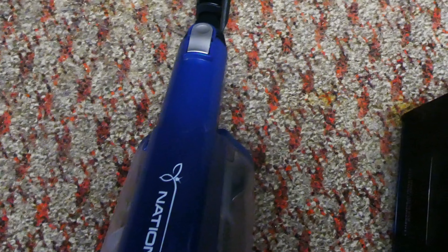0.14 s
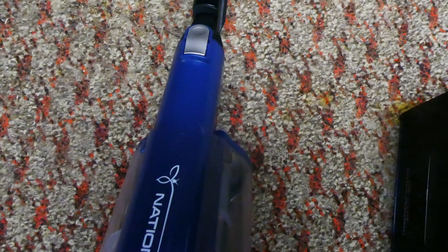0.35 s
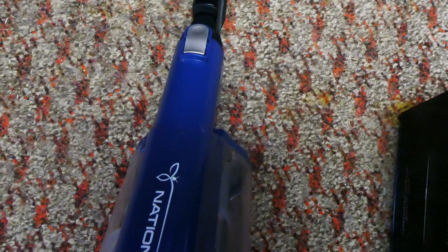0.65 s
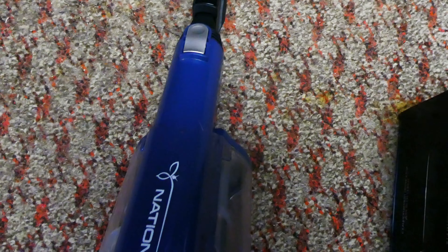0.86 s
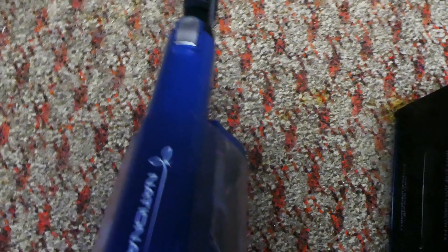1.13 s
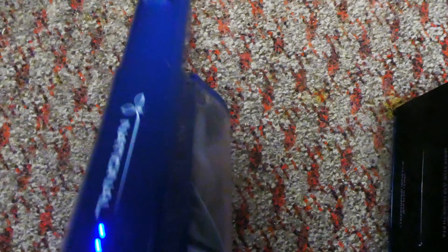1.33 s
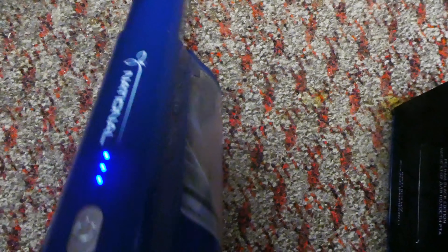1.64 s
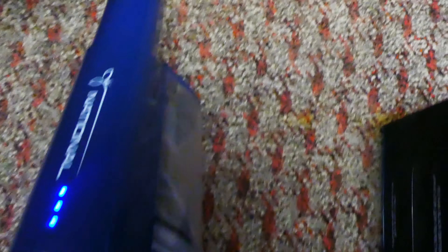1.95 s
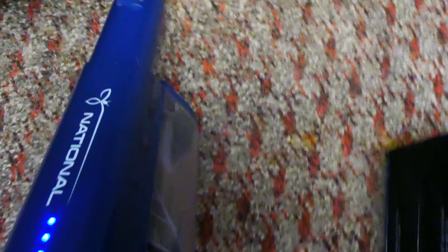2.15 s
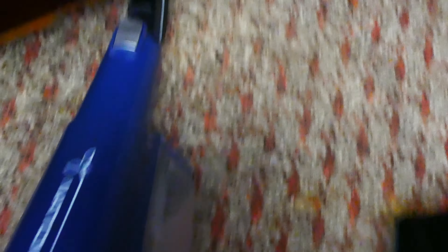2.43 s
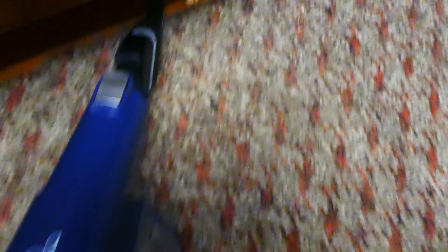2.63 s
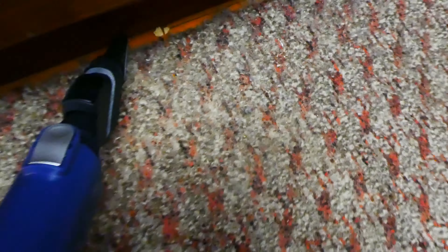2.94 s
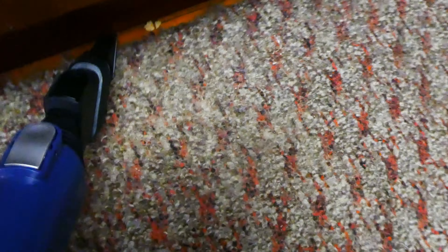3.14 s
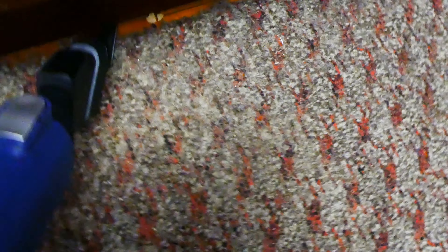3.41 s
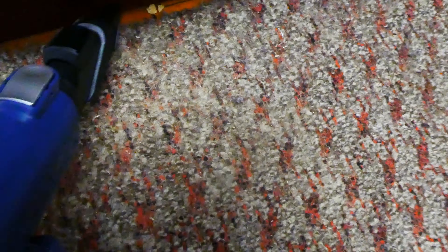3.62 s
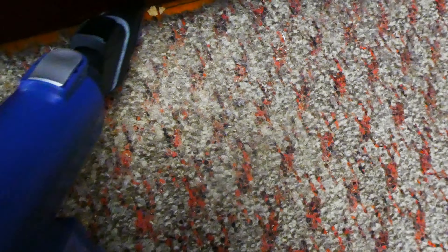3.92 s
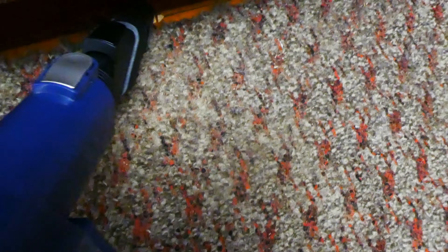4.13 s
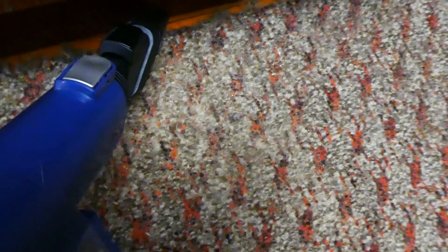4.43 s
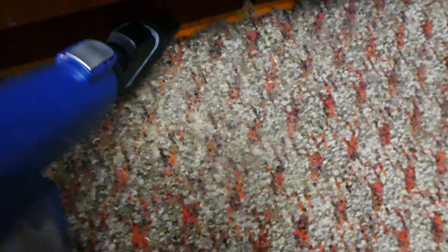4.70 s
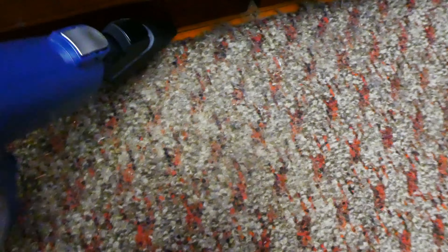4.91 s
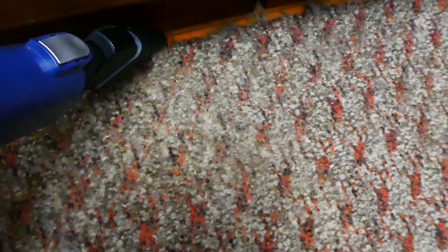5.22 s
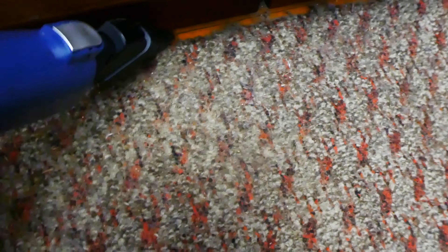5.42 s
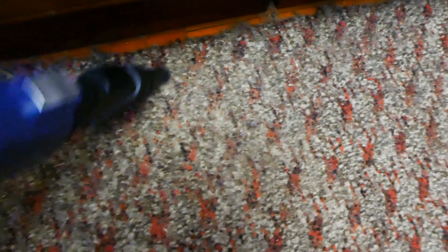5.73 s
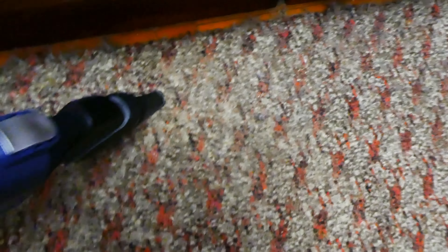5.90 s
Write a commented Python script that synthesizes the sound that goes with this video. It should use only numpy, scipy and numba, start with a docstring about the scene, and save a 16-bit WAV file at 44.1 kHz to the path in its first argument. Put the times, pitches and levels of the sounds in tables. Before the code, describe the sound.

A small vacuum cleaner clicks on close by, its whine climbing within a second to a steady high-pitched drone and airy roar, with a brief grit rattle.

```python
"""A small switch click in a quiet room is heard first; then a cordless stick vacuum starts beside the microphone.
Chopped current whistles, shaft-locked tones climb to about 448 turns a second, and brushes scratch the commutator.
A flap pops open; turbulent air is noise shaped by the ducts, its nozzle on carpet along a skirting board.
Later the nozzle tips up and grit, as short resonant blows and dense ticks, rattles up the tube.
The recorder's limiter ducks under the loudest peaks."""
import sys
import numpy as np
from scipy import signal
from scipy.fft import rfft, irfft
from scipy.io import wavfile
from scipy.ndimage import uniform_filter1d, minimum_filter1d
from numba import njit

SR = 44100
rng = np.random.default_rng(int(sys.argv[2]) if len(sys.argv) > 2 else 0)


def transcribe(u):
    """Save the signal u as a 16-bit wav file named by the first command-line argument.

    u: samples, shape (n,) or (channels, n), limited to [-1, 1]; the rate is SR.
    q: integer samples, one column per channel.
    """
    v = np.clip(np.atleast_2d(u).T, -1, 1)
    q = np.round(v * 32767).astype(np.int16)
    wavfile.write(sys.argv[1], SR, q)


N = 267334
TIME = np.arange(N) / SR  # seconds
FREQ = np.maximum(np.fft.rfftfreq(N, 1 / SR), 1)  # Hz

# The motor starts, gains speed evenly under its current limit, then eases up to full speed.
POWER_ON_S, START_S, RAMP_END_S, BREAKAWAY_S = 0.497, .622, 1.25, .028
RAMP_HZ_PER_S, FULL_HZ = 534.2, 448.5
# Time constants of the final approach to full speed, in seconds.
EASE_S = (.132, .35)
# The suction load slowly drags the motor down a little.
SAG_FROM_S, SAG_S, SAG_HZ = 4.5, 1.02, 1.96
# The nozzle tips away from the skirting board.
TIP_FROM_S, TIP_S = 4.57, 0.48
CHOP_HZ = 4984.3  # rate of the current chopper
TOP_HZ = 15600  # upper edge of the recorded band

# Loud whines. Each entry: name, multiple of the shaft speed.
WHINE_ORDERS = {"rotor 2": 2, "bearing": 2.573, "rotor 3": 3, "commutator": 5, "fan": 7, "commutator 2": 10,
                "commutator 3": 15}
# Growth of the whines. Each row: name, level in dB at full speed before the casing, power of the speed,
# drift in dB per s as the hand wanders, change in dB with the nozzle tipped.
WHINES = [("rotor 2", -43, 0.33, -0.86, 5), ("bearing", -28, 1.77, -2.3, -10.5),
          ("rotor 3", -27, 6.5, -2.16, -5), ("commutator", -23.5, 1.87, 0.067, -9.5),
          ("fan", -20.5, 1.95, -1.71, -3.5), ("commutator 2", -27, 1.6, -1.3, 1),
          ("commutator 3", -30.5, 5.1, -1.4, 0)]
# Standing waves shift past the microphone. Each row: whine, centre in seconds, length in seconds, change in dB.
STANDING_WAVES = [("commutator 3", 1.85, 0.13, -16), ("commutator 2", 1.9, 1, -11.5),
                  ("commutator 3", 2.42, .13, -8), ("fan", 2.66, .3, -15), ("commutator", 3.15, .6, -9),
                  ("bearing", 3.2, .6, -8), ("commutator 3", 3.3, 0.55, -6), ("commutator 3", 4.29, .4, -9),
                  ("rotor 3", 4.72, 0.49, -14), ("commutator 3", 5.18, 0.59, -16),
                  ("commutator", 5.53, .2, -10), ("commutator", 5.78, 0.13, 8.2),
                  ("commutator 3", 5.98, 0.074, 9.7), ("fan", 6.0, 0.12, 5.8)]
# Weaker shaft tones; the fractions come from the bearing. Each entry: multiple of the shaft speed.
WEAK_ORDERS = [4, 4.146, 4.573, 5.146, 6, 7.146, 8, 9, 12, 14, 20, 21, 22, 25, 26, 28, 30, 35]
# Their strengths in the same order. Each entry: level in dB at full speed before the casing.
WEAK_DB = [-38.5, -47, -38, -42.5, -40.5, -48, -62, -46.5, -47, -44, -39.5, -51, -51, -44.5, -67, -62, -50,
           -64]
# Hum of the rotor's unbalance, before trim and flutter. Each row: time in seconds, level in dB.
HUM = [(2.08, -23.5), (2.59, -19), (3.81, -15.5), (4.68, -12.5)]
# Casing resonances and nulls the tones glide through. Each row: centre in Hz, width in Hz, lift in dB.
CASING = [(374.6, 77, 13), (422.3, 9, -10), (439, 3.5, -17.5), (669, 89, 17), (863, 54, 7),
          (1433, 214, 6.5), (1640, 79, 0), (2087, 125, -5.5), (2966, 350, 4.5), (3480, 73, 4.5),
          (12930, 460, 17), (15200, 510, 13)]
# Whistle of the chopped battery current. Each row: time in seconds, level in dB.
CHOPPER = [(0.53, -52.5), (0.7, -44.5), (1.46, -32), (1.95, -41), (2.84, -46), (3.29, -31), (4.12, -43),
           (5.34, -36), (6.0, -39)]
# Sidebands the commutator adds to the whistle. Each row: multiple of the speed added, relative level in dB.
SIDEBANDS = [(-10, -7.5), (-7, -17), (-5, -1), (-2, -17), (2, -12), (5, -9), (10, -22)]
# Motor housing rung by the brushes. Each row: centre in Hz, width in Hz, relative level in dB.
HOUSING = [(1117, 120, 4), (1826, 46, 5.5), (2330, 190, 3), (3480, 140, -1.5)]
# Colour of the air before the duct resonances. Each row: frequency in Hz, density in dB per Hz.
AIR_COLOUR = [(30, -109), (60, -86), (110, -79), (200, -62.5), (290, -60), (420, -52), (580, -62),
              (1000, -65.5), (1400, -59.5), (3000, -66), (5500, -67), (8200, -74.5), (10000, -71),
              (15500, -88.5)]
# Resonances of tube and dust bin. Each row: centre in Hz, width in Hz, lift in dB.
DUCT = [(717, 43, 2.5), (1323, 37, 6), (1780, 87, 2), (2470, 43, 4.5), (3580, 390, 3.5), (7360, 140, 5.5)]
# Rumble, rush and hiss in turn. Each row: gain in dB at full speed, power of the speed,
# change in dB with the nozzle tipped.
SUCTION = [(0.5, 0.88, -1.7), (2, 0.94, -5), (1.44, 1.6, -2)]
# The airflow surges. Each row: centre in seconds, length in seconds, lift of the hum in dB,
# lift of the rumble in dB (the rush gets half).
SURGES = [(3.0, 0.83, 1, 1.5), (3.67, 0.16, 2.5, 2.5), (4.006, 0.096, 4, 3.5), (4.338, 0.045, 2, 0)]
# Resonances of the nozzle mouth. Each row: centre in Hz, width in Hz, level in dB against the board,
# level in dB tipped open; both before speed scaling.
MOUTH = [(700, 300, -44.5, -34.5), (2660, 510, -49, -31.5)]
# The body drifts to the left, scaled for each source. Each row: time in seconds, left minus right in dB.
PAN = [(0, 5), (1, 2), (1.75, 2), (3, 3.5), (4.5, 5.5), (6, 7)]
# The inlet flap pops open. Each row: start in seconds, peak in dB.
FLAP = [(.8772, -5)]
# Modes of the flap. Each row: frequency in Hz, relative level in dB, 60 dB decay time in seconds.
FLAP_MODES = [(1116, -1, 0.011), (940, -25, 0.013), (1510, -10, 0.0099), (4800, -18, .005)]
# Grit hits the tube. Each row: start in seconds, peak in dB before the limiter.
GRIT = [(4.7125, -9), (4.7228, -0.5), (4.7255, -1), (4.7752, 11)]
# Modes of the tube wall. Each row: frequency in Hz, relative level in dB, 60 dB decay time in seconds.
TUBE_MODES = [(5430, -2, 0.0079), (7100, -12, 0.0058), (9000, -2, 0.0071), (8700, -7.5, 0.0071),
              (10240, -12, 0.011), (12000, -12, 0.005)]
# One grain pings the bin. Each row: start in seconds, peak in dB.
PING = [(4.9352, -13)]
# Mode of the bin. Each row: frequency in Hz, relative level in dB, 60 dB decay time in seconds.
PING_MODES = [(5370, 0, 0.018)]
# Clicks of the switch and handle. Each row: start in seconds, peak in dB.
SWITCH = [(.0365, -34), (.4125, -30.5), (.482, -34.5), (.579, -31.5)]
# Modes of the plastic handle. Each row: frequency in Hz, relative level in dB, 60 dB decay time in seconds.
HANDLE_MODES = [(1155, -1, 0.032), (2760, 2, 0.0084), (4420, 7, 0.0073), (10300, -4, 0.011)]
# Quiet room, before stereo widening. Each row: frequency in Hz, density in dB per Hz.
ROOM_TONE = [(30, -105), (120, -92.5), (300, -89), (1000, -99), (2400, -99), (3500, -106), (4700, -100),
             (6500, -108), (10000, -110), (15000, -119)]


def spin_up():
    """Rotational dynamics: soft breakaway, even climb in turns per second, exponential approach, slight sag."""
    climbing_s = BREAKAWAY_S * np.logaddexp(0, (np.minimum(TIME, RAMP_END_S) - START_S) / BREAKAWAY_S)
    climb = RAMP_HZ_PER_S * climbing_s * ramp(POWER_ON_S, START_S - POWER_ON_S)
    since_ramp = np.maximum(TIME - RAMP_END_S, 0)
    eased = 1 - np.mean([np.exp(-since_ramp / s) for s in EASE_S], axis=0)
    return climb + (FULL_HZ - climb[-1]) * eased - SAG_HZ * ramp(SAG_FROM_S, SAG_S)


def motor(speed, angle, pan_db, tipped, hum_db):
    """Order tones: all lock to the shaft, grow with speed and sweep through the casing's resonances."""
    hum = unbalance_hum(speed, angle, pan_db, tipped, hum_db)
    tones = whines(speed, angle, tipped) + weak_tones(speed, angle, tipped)
    # the whines jump up when the current limit lets go
    drive = undb(-5.0 * (1 - ramp(RAMP_END_S, 0.004)))
    return hum + drive * tones * panned(0.74 * pan_db)


def unbalance_hum(speed, angle, pan_db, tipped, hum_db, trim_db=-1.9, flutter_db=2.07):
    """Rotating unbalance: one cycle a turn, with turbulent flutter that calms as the nozzle tips."""
    flutter = flutter_db * (1 - .75 * tipped) * walk(22.23)
    gain = undb(hum_db + trim_db - 1.5 * tipped + flutter)
    hum = tone(angle, fade=0.016, spread=0.16)
    return hum * gain * casing(speed) * grown(speed, 1.6) * panned(pan_db)


def whines(speed, angle, tipped, rough=0.11):
    """Harmonic excitation: rotor, bearing, commutator and fan sound at fixed multiples of the speed."""
    # while the pitch glides, the tones stumble through many small resonances
    gliding = 1 - speed / speed.max()
    running_s = np.maximum(TIME - RAMP_END_S, 0)
    total = 0
    for name, db, growth, drift_db_per_s, tipped_db in WHINES:
        order = WHINE_ORDERS[name]
        stumble = undb(4 * gliding * (np.clip(walk(45), -2, 1) - .2))
        fades_db = sum(swell(*row) for which, *row in STANDING_WAVES if which == name)
        moved_db = drift_db_per_s * running_s + tipped_db * tipped + fades_db
        gain = undb(db + moved_db) * casing(order * speed) * grown(speed, growth)
        roughness = 1 + rough * walk(90)
        total = total + tone(order * angle, fade=0.028, spread=0.12) * gain * stumble * roughness
    return total


def weak_tones(speed, angle, tipped):
    """Multipath interference: weaker orders vary more with the moving reflections the higher they lie."""
    total = 0
    for order, db in zip(WEAK_ORDERS, WEAK_DB):
        partial = tone(order * angle, fade=0.054 + 0.048 * order, spread=0.65, drift_rate=3.3)
        total = total + partial * undb(db) * casing(order * speed)
    return total * undb(-1 * tipped) * grown(speed, 5.1)


def casing(hz, cutoff_hz=230):
    """Radiation of a small body: resonances and nulls weight a tone, and little bass escapes."""
    return undb(lift(hz, CASING)) * hz ** 4 / (hz ** 4 + cutoff_hz ** 4)


def tone(phase, fade, spread, drift_rate=2.535):
    """Interference: a sine adds to reflections that shift as the hand moves and differ at the two ears."""
    knots = np.arange(0, N / SR + 1, 1 / drift_rate)
    common, apart = rng.standard_normal((2, len(knots))) + 1j * rng.standard_normal((2, len(knots)))
    paths = np.array([np.interp(TIME, knots, 1 + fade * common + ear * spread * apart) for ear in (1, -1)])
    phase = phase + 2 * np.pi * rng.random()
    return np.sqrt(2 / (1 + fade ** 2)) * (paths.real * np.sin(phase) + paths.imag * np.cos(phase))


def controller(speed, angle, settle_hz=400):
    """Modulation: chopped current makes the windings whistle, and the commutator splits it into sidebands."""
    db, = curves(CHOPPER)
    phase = 2 * np.pi * CHOP_HZ * TIME
    # the sidebands fade once the motor is up to speed
    starting = np.clip(speed / 20, 0, 1) * np.exp(-(speed / settle_hz) ** 6)
    sidebands = 0
    for order, side_db in SIDEBANDS:
        uneven = undb(side_db + 3 * walk(34.4))
        sidebands = sidebands + uneven * tone(phase + order * angle, fade=0.17, spread=0.12, drift_rate=8.5)
    harmonics = np.sin(2 * phase) + undb(-14) * np.sin(3 * phase)
    commutation = 1 + .4 * starting * np.sin(5 * angle)
    overtones = undb(-2 - 20 * grown(speed, 1.15)) * np.sqrt(2) * harmonics * commutation
    whistle = tone(phase, fade=0.19, spread=0.053) + starting * sidebands + overtones
    return whistle * undb(db) * ramp(POWER_ON_S, .018)


def brushes(speed, angle, starting_db=-25.5, running_db=-43, full_scrape_hz=195):
    """Friction excitation: carbon brushes cross the commutator gaps and ring the housing, hardest at the start."""
    gaps = np.cos(5 * angle)
    scratch = irfft(stereo_noise(0.19), N) * (1 + gaps) * undb(2.0 * walk(59.73))
    ring = sum(undb(db) * band(scratch, hz, width) for hz, width, db in HOUSING)
    ring = signal.sosfilt(signal.butter(2, [700, 3200], "bandpass", fs=SR, output="sos"), ring)
    level_db = starting_db + (running_db - starting_db) * ramp(1.27, 2.6)
    return ring / ring.std() * undb(level_db) * np.minimum(speed / full_scrape_hz, 1) ** 1.65


def suction(speed, angle, pan_db, tipped, surge_db, rumble_hz=750, hiss_hz=2900):
    """Turbulent flow: rumble builds and gusts, hiss stays smooth, and the rotor pulses the upper bands each turn."""
    shape = colour(AIR_COLOUR) * undb(lift(FREQ, DUCT))
    # the stereo image is widest in the deep bass and the treble
    width = .3 + .5 * (FREQ / 11500) ** 2 + 0.89 / (1 + (FREQ / 80) ** 2)
    noise = shape * stereo_noise(width)
    low = 1 / (1 + (FREQ / rumble_hz) ** 6)
    high = 1 / (1 + (hiss_hz / FREQ) ** 12)
    bands = []
    for share, (db, growth, tipped_db) in zip((low, 1 - low - high, high), SUCTION):
        bands.append(irfft(noise * share, N) * undb(db + tipped_db * tipped) * grown(speed, growth))
    rumble, rush, hiss = bands
    build_db = -4.0 * (1 - ramp(RAMP_END_S, 1.7))
    rumble = rumble * undb(2.6 * walk(24.8) + surge_db + build_db)
    rush = rush * undb(1.3 * walk(24.76) + .5 * surge_db)
    upper = (rush + hiss) * (1 + 0.093 * np.sin(angle))
    return (rumble + upper) * panned(0.39 * pan_db)


def nozzle(speed, pan_db, tipped):
    """Cavity resonance: passing air excites the mouth's broad resonances, which hoot as it tips open."""
    out = 0
    for hz, width, closed_db, open_db in MOUTH:
        hoot = band(band(irfft(stereo_noise(0.79), N), hz, width), hz, width)
        out = out + hoot / hoot.std() * undb(closed_db + (open_db - closed_db) * tipped)
    return out * grown(speed, 4.8) * panned(1.2 * pan_db)


def inlet_flap():
    """Impulse response: the flap pops open and rings its few damped modes."""
    return knocks(FLAP, FLAP_MODES, crack=.06, crack_t60=0.018, width=0.13, low_hz=500)


def grit():
    """Impact excitation: single grains strike the tube wall amid a patter of fine sand."""
    return knocks(GRIT, TUBE_MODES, crack=2.1, crack_t60=0.012, width=0.84, low_hz=3530) + rattle()


def rattle(centre_s=4.721, spread_s=0.0069, grains_per_s=2500, peak_db=2.0):
    """Random impacts: a pinch of fine sand patters up the tube and wakes the housing's ring."""
    density = np.exp(-.5 * ((TIME - centre_s) / spread_s) ** 2)
    grains = (rng.random(N) < density * grains_per_s / SR) * rng.standard_normal(N)
    tick = rng.standard_normal((2, 90)) * np.exp(-np.arange(90) / 25)
    sand = signal.fftconvolve(grains[None], tick + tick[::-1] * .5, axes=1)[:, :N]
    sand = sand + 2.2 * band(sand, 2640, 720)
    sand = signal.sosfilt(signal.butter(1, 7000, fs=SR, output="sos"), treble(sand, 1800))
    return undb(peak_db) * sand / np.abs(sand).max()


def bin_ping():
    """Single-mode response: one grain pings the bin."""
    return knocks(PING, PING_MODES, crack=.1, crack_t60=.01, width=.3, low_hz=3000)


def handle_clicks():
    """Impulse response: the switch and handle click through the modes of the plastic."""
    return knocks(SWITCH, HANDLE_MODES, crack=1.4, crack_t60=0.029, width=0.99, low_hz=900)


def knocks(events, modes, crack, crack_t60, width, low_hz, high_hz=12000):
    """Modal synthesis: each blow rings the damped modes of a part, with a short noisy crack."""
    out = np.zeros((2, N))
    t = TIME[:SR // 10]
    crack_filter = signal.butter(2, min(high_hz, SR * .45), fs=SR, output="sos")
    for s, db in events:
        # phases differ between the ears
        offsets = width * rng.standard_normal((len(modes), 2, 1))
        ring = 0
        for (hz, mode_db, t60), offset in zip(modes, offsets):
            ring = ring + undb(mode_db - 60 * t / t60) * np.sin(2 * np.pi * hz * t + offset)
        snap = signal.sosfilt(crack_filter, rng.standard_normal((2, len(t))))
        blow = ring + crack * snap * undb(-60 * t / crack_t60)
        hit = treble(blow * (1 - np.exp(-t / 0.0012)), low_hz)
        start = int(s * SR)
        out[:, start:start + len(t)] += undb(db) * hit / np.abs(hit).max()
    return out


def quiet_room():
    """Diffuse field: faint coloured noise with equal mid and side parts."""
    return irfft(colour(ROOM_TONE) * stereo_noise(1.0), N)


def undb(db):
    """Level law: decibels to amplitude gain."""
    return 10 ** (np.asarray(db) / 20)


def curves(table):
    """Linear interpolation: each column of a table is joined by straight lines in time."""
    s, *columns = np.transpose(table)
    return [np.interp(TIME, s, c) for c in columns]


def colour(points):
    """Spectral density: the gain that gives unit white noise the listed density."""
    hz, db = np.transpose(points)
    return undb(np.interp(np.log(FREQ), np.log(hz), db)) * np.sqrt(SR / 2)


def walk(rate):
    """Slow random modulation: smooth chance of unit spread, renewed rate times a second."""
    k = max(int(SR / rate), 2)
    held = np.repeat(rng.standard_normal(N // k + 2), k)
    smooth = uniform_filter1d(uniform_filter1d(held, k), k)[:N]
    return smooth / smooth.std()


def panned(pan_db):
    """Interaural level difference: left and right gains with a mean of one."""
    gains = undb(np.array([pan_db, -pan_db]) / 2)
    return gains / gains.mean(axis=0)


def stereo_noise(width):
    """Partial coherence: spectra of left and right noise share a mid part and oppose a side part."""
    mid, side = rfft(rng.standard_normal((2, N)))
    return np.array([mid + width * side, mid - width * side])


def band(x, hz, width):
    """Simple resonator: two poles with a peak gain of one."""
    return signal.lfilter(*signal.iirpeak(hz, hz / width, fs=SR), x)


def lift(hz, resonances):
    """Resonance curves: the decibels that a set of resonances adds at these frequencies."""
    return sum(db / (1 + (2 * (hz - centre) / width) ** 2) for centre, width, db in resonances)


def treble(x, low_hz):
    """Radiation efficiency: small parts radiate little bass."""
    return signal.sosfilt(signal.butter(2, low_hz, "highpass", fs=SR, output="sos"), x)


def ramp(from_s, length_s):
    """Linear transition: an even change from zero to one."""
    return np.clip((TIME - from_s) / length_s, 0, 1)


def swell(s, length_s, db):
    """Bell-shaped change: decibels depart smoothly around a moment and return."""
    return db * .5 ** ((2 * (TIME - s) / length_s) ** 2)


def grown(speed, power):
    """Power law: the gain of a sound that grows with the motor's speed."""
    return (speed / FULL_HZ) ** max(power, .1)


@njit
def follow(x, attack, release):
    """Envelope detection: the level rises fast and sinks slowly."""
    out, e = np.empty(len(x)), 0.
    for i in range(len(x)):
        e += (x[i] - e) * (attack if x[i] > e else release)
        out[i] = e
    return out


def scene():
    """Superposition: the shaft drives machine and air, tipping recolours them, and knocks and the room are added."""
    speed = spin_up()
    tipped = ramp(TIP_FROM_S, TIP_S)
    pan_db, = curves(PAN)
    hum_db = curves(HUM)[0] + sum(swell(s, length_s, db) for s, length_s, db, _ in SURGES)
    surge_db = sum(swell(s, length_s, db) for s, length_s, _, db in SURGES)
    # the shaft angle in radians, with a trace of speed jitter
    angle = 2 * np.pi * np.cumsum(speed * (1 + 0.00017 * walk(9))) / SR
    machine = motor(speed, angle, pan_db, tipped, hum_db) + controller(speed, angle) + brushes(speed, angle)
    air = suction(speed, angle, pan_db, tipped, surge_db) + nozzle(speed, pan_db, tipped)
    impacts = inlet_flap() + grit() + bin_ping() + handle_clicks()
    return machine + air + impacts + quiet_room()


def record(dry, ceiling_db=-2.5, attack_s=0.00017, release_s=0.13):
    """Peak limiting: the gain ducks around the loudest peaks and recovers slowly; the top of the band is cut."""
    envelope = follow(np.abs(dry).max(axis=0), 1 - np.exp(-1 / (attack_s * SR)), 1 / (release_s * SR))
    gain = np.minimum(1, undb(ceiling_db) / (envelope + 1e-9))
    # centred windows let the gain begin to fall slightly ahead of a peak
    held = minimum_filter1d(gain, size=111)
    ahead = uniform_filter1d(uniform_filter1d(held, size=65), size=45)
    return signal.sosfilt(signal.ellip(10, .2, 80, TOP_HZ, fs=SR, output="sos"), dry * ahead)


dry = scene()
out = record(dry)
transcribe(out)
```